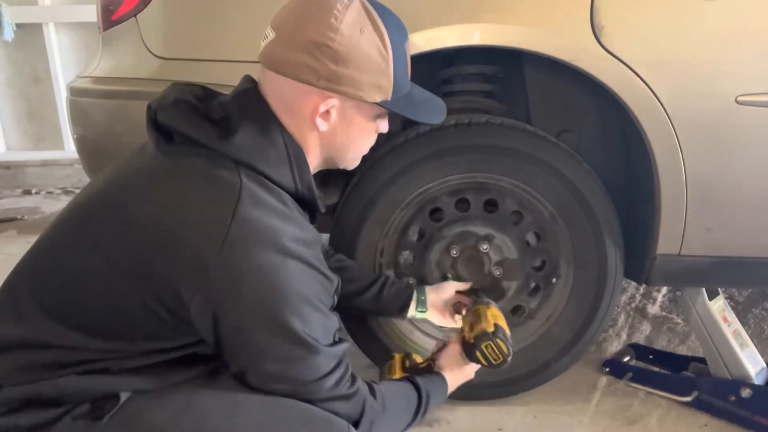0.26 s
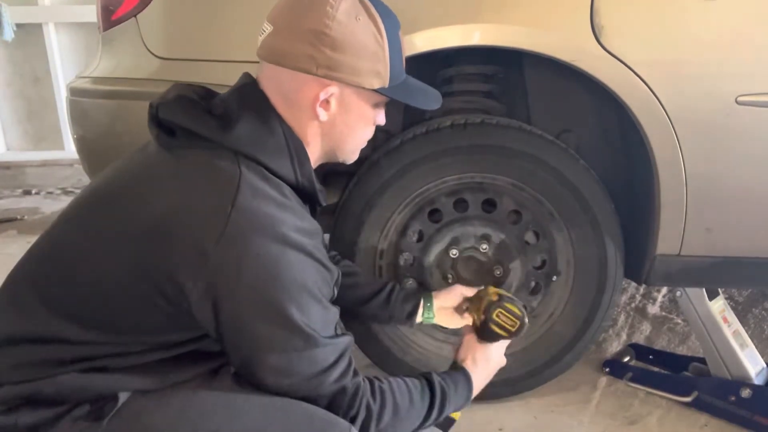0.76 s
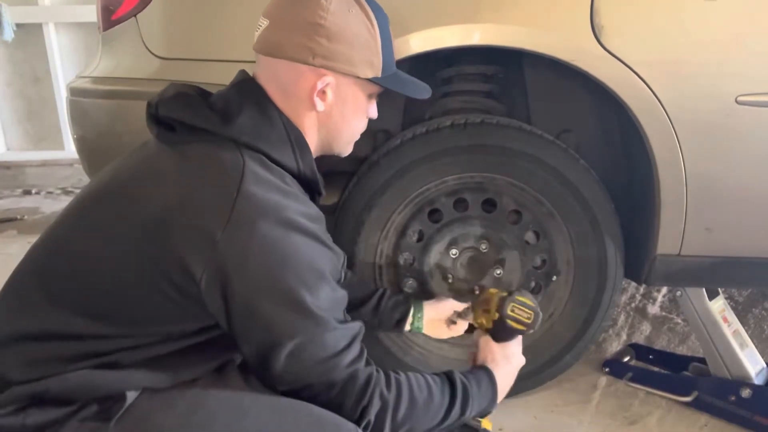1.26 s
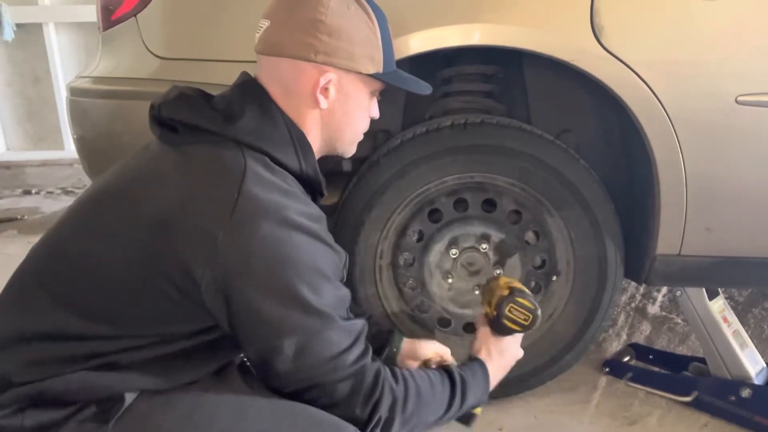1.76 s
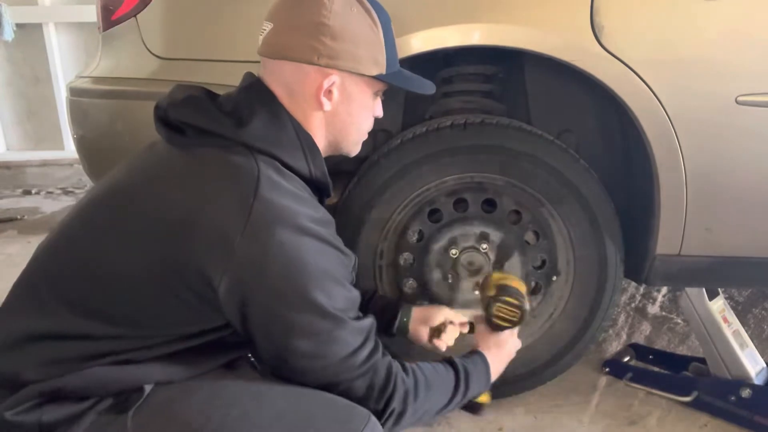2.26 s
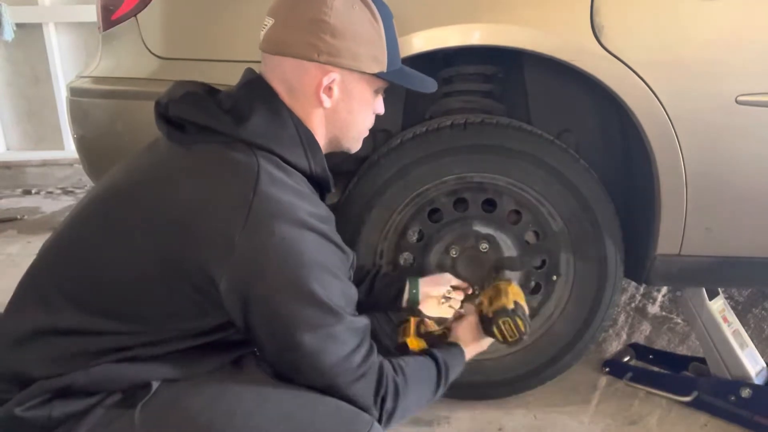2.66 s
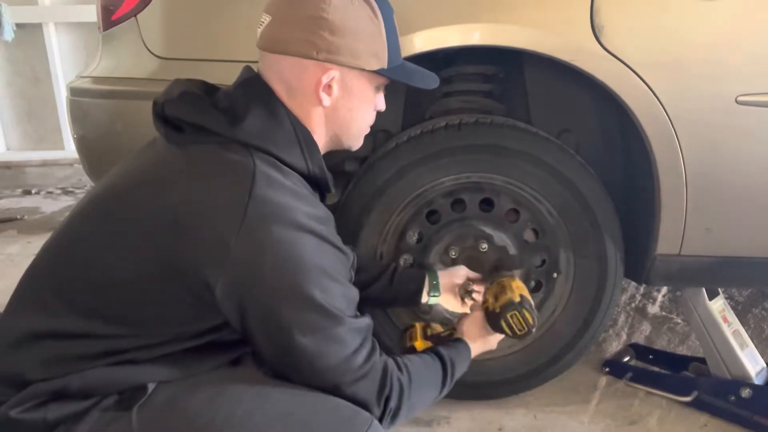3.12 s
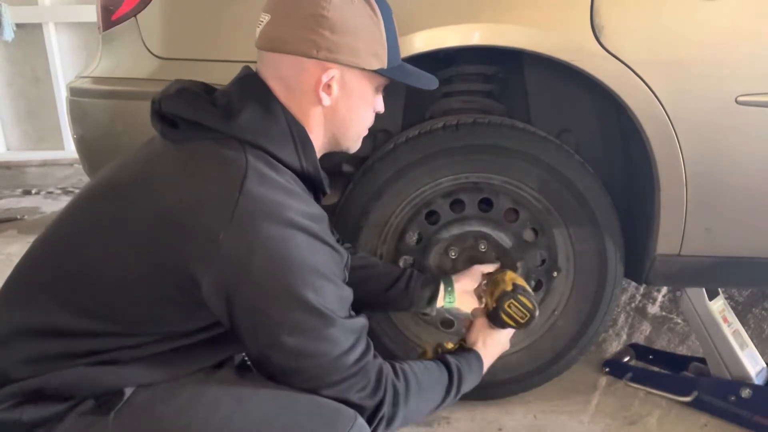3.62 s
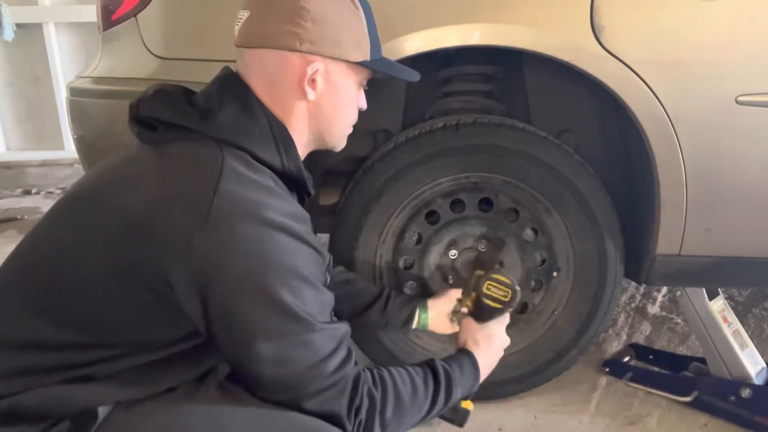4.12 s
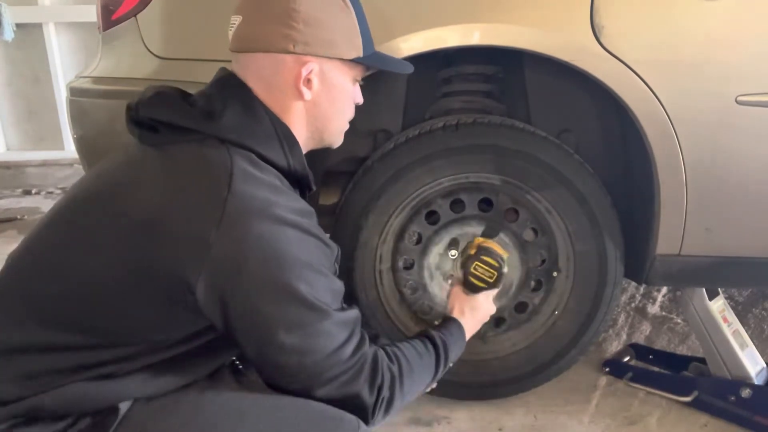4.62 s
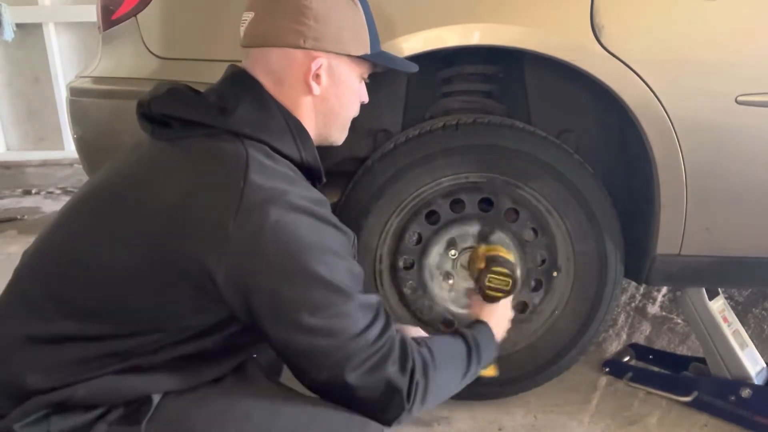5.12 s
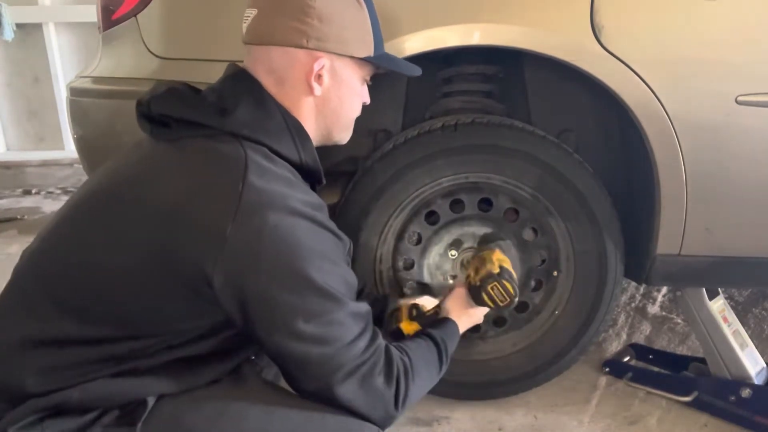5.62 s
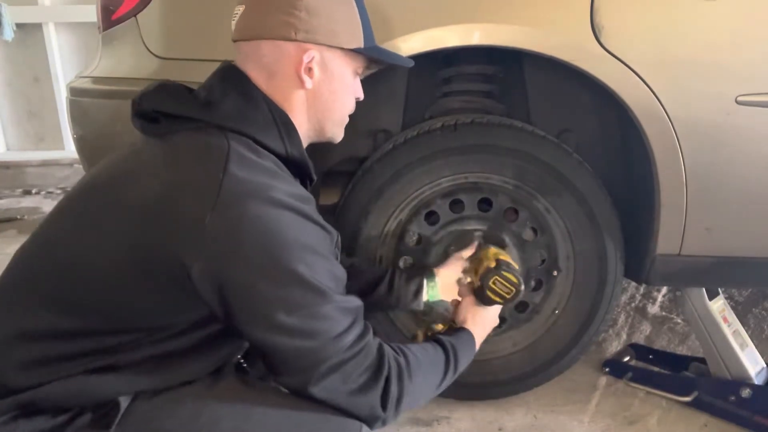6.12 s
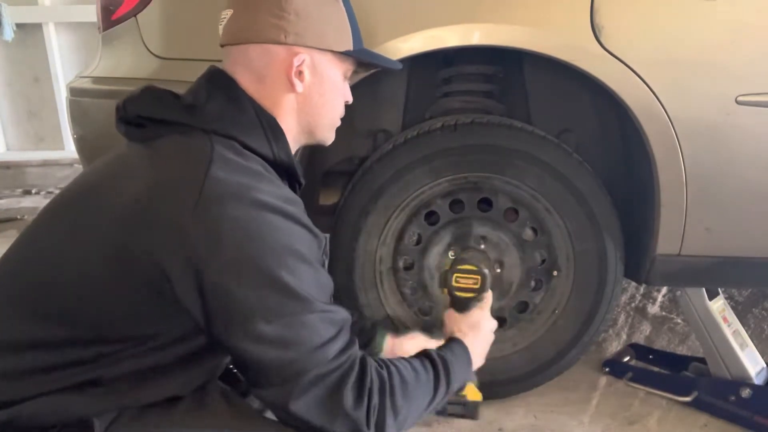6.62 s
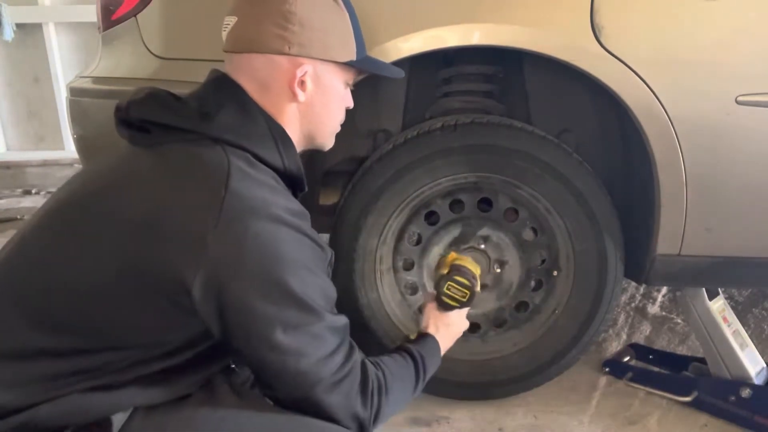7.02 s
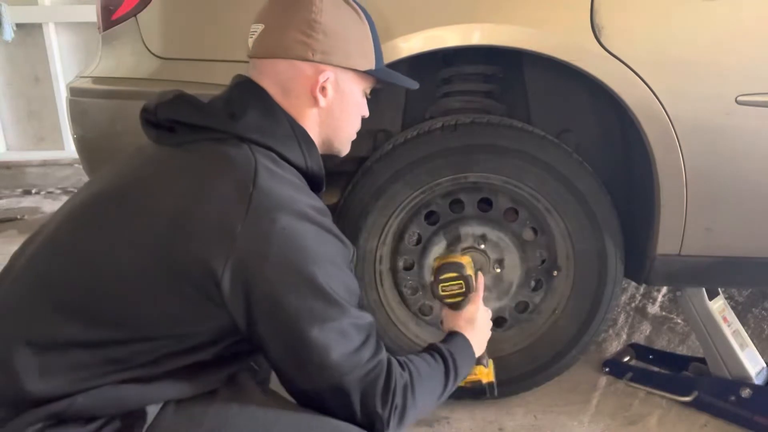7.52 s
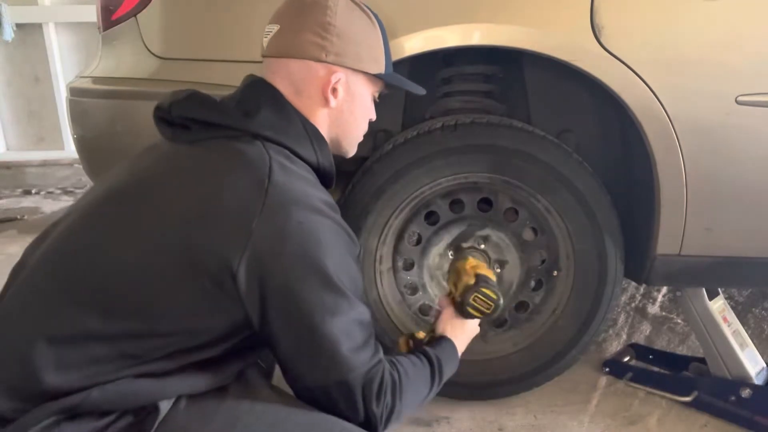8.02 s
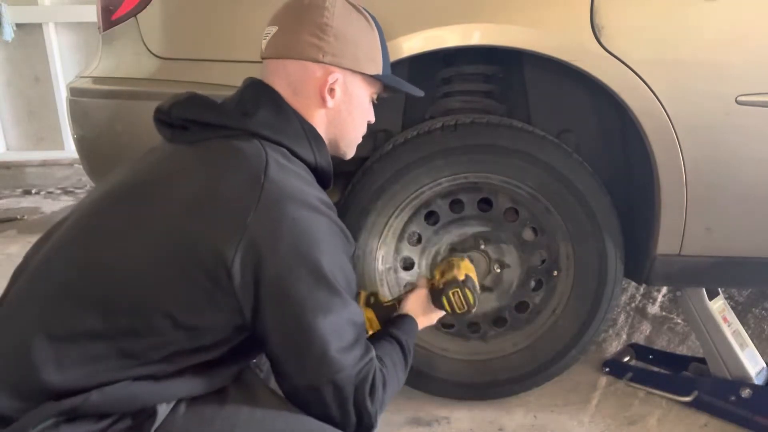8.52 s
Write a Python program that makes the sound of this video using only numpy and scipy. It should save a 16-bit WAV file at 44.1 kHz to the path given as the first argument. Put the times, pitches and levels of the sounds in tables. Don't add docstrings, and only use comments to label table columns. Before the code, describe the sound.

Two hard, brief bursts of metallic hammering, about forty blows a second, each leading into a gritty gear whir and airy fan hiss that falls away. Around them, a socket clunks on nuts, rim and hollow tyre, small parts tick and sleeves brush. It opens on a motor already slowing and closes with a faint last pull. Heard very close in a hard-surfaced space, with a wavering low hum behind.

```python
import sys
import numpy as np
from scipy import signal
from scipy.fft import rfft, irfft, next_fast_len
from scipy.io import wavfile

SR = 44100
rng = np.random.default_rng(int(sys.argv[2]) if len(sys.argv) > 2 else 0)


def log_audio(samples):
    frames = np.atleast_2d(samples).T
    limited = np.clip(frames, -1, 1)
    pcm = np.round(limited * 32767).astype(np.int16)
    wavfile.write(sys.argv[1], SR, pcm)


def rack_gain(trim_db):
    fader = np.asarray(trim_db, float)
    return 10 ** (fader / 20)


N = 386757

# nut_free_s, let_go_s, coast_s, level_db
PULLS = [
    (-.3, 0.24, .55, -2.5),
    (3, 3.582, 0.38, -1.5),
    (5.498, 6.026, 0.45, -3),
    (9.1, 9.5, 0.45, -13),
]
BITES_S = [
    -.7,
    2.83,
    5.355,
    8.737,
]
# offset_s, gear_db, fan_db
RUN_UP = [(-.075, -68, -80), (-.04, -48, -52), (0, -42, -48)]
# offset_s, gear_db, fan_db
BITING = [(0.028, -23, -42), (.17, -38.5, -45)]
# offset_s, gear_db, fan_db
SPINNING = [(0, -30, -43.5), (0.081, -34, -47), (0.182, -42, -44), (.3, -32.5, -32.5)]
# freq_hz, density_db_per_hz
GEAR_SPECTRUM = [(71, -44.5), (120, -0.5), (216, -4.5), (298, -27), (345, -6.5), (630, -10), (708, -6),
                 (1070, -7.5), (1450, -9), (2360, -7.5), (4000, -11), (5200, -37), (8800, -120)]
# tooth_rate_multiple, level_db
MESH_ORDERS = [(.5, -4), (1, -4), (2, 0), (3, 0), (4, -1), (5, -4)]
# freq_hz, density_db_per_hz
FAN_SPECTRUM = [(1470, -40.5), (2500, -25.5), (5120, -2.5), (5620, -3.5), (6900, 1.5), (7920, -7.5),
                (10100, -6), (12600, -5.5), (15500, -4.5), (17000, -20.5)]
# freq_hz, width_hz, gain_db
CASING_MODES = [(705, 80, 5), (1050, 150, 4), (3500, 180, 8)]
# start_s, hum_db, rumble_db, sleeves_db
AROUND = [(0, -43.5, -38.5, -50.5), (.73, -60, -53.5, -69), (1.49, -52, -51.5, -65), (1.65, -86, -62, -67),
          (2.1, -52, -56.5, -56), (2.47, -71, -61.5, -49), (2.61, -40, -50, -39), (2.83, -52, -52, -54),
          (3.3, -43.5, -43, -50), (3.75, -50.5, -51.5, -67), (4.27, -48.5, -50.5, -61.5),
          (4.6, -38.5, -47.5, -62), (5.35, -40, -38, -40), (5.6, -42.5, -37, -54.5),
          (6.4, -40.5, -51.5, -65), (7.45, -38.5, -42.5, -56.5), (7.72, -43.5, -51, -60.5),
          (8.45, -31, -39, -46.5)]
# freq_hz, density_db_per_hz
RUMBLE_SPECTRUM = [(13, -53.5), (22, -31), (54, 2), (70, 2.5), (86, -16.5), (102, -12.5), (129, -10.5),
                   (141, -14), (320, -36), (420, -76), (700, -120)]
# freq_hz, density_db_per_hz
RUSTLE_SPECTRUM = [(120, -33.5), (200, -2.5), (719, -13.5), (1750, -25.5), (7790, -42.5), (11100, -45.5),
                   (14000, -37.5)]
# start_s, peak_db, bright_db, wheel_db
CLATTER = [(2.833, -3, -2.5, -10), (2.8602, -14.5, -9, -23), (2.8714, -8, 3, -22.5), (2.8814, -10, -6, 4),
           (2.9033, -11, 4.5, -19), (2.9164, -8, -3.5, -14.5), (2.933, -8, 2, -22.5),
           (3.1346, -24, -9, -13), (5.358, -8.5, -1.5, -5.5), (5.3822, -12, 0, -26),
           (5.3918, -7, -1.5, -24.5), (5.4034, -10, -0.5, 6), (5.4174, -14.5, -6.5, -5.5),
           (5.4271, -14.5, -1, -26.5), (5.455, -19, 4.5, -24), (5.6745, -31.5, 8.5, -21.5),
           (5.7164, -25, 1.5, -14.5), (8.741, -19, 4.5, -6.5), (8.7557, -27.5, -7.5, -18)]
# start_s, peak_db, bright_db, wheel_db, socket_db
HAMMERING = [(2.9432, -8.5, -2, -7, -5), (2.9687, -8.5, -3.5, -13, -3), (2.9946, -5.5, -2.5, -9, -1.5),
             (3.0197, -9.5, 3.5, 2, -0.5), (3.0448, -5.5, -1.5, -7.5, -1.5), (3.0682, -7, 0.5, -2, -0.5),
             (3.093, -8.5, -2, -11.5, 2.5), (3.1188, -7, -0.5, -14, -4.5), (5.4374, -6, 1, -8.5, 0),
             (5.4632, -9.5, -2.5, -11.5, -1), (5.491, -9.5, 2, -16, -3), (5.516, -9, 1, -1.5, 3),
             (5.5395, -9.5, 0.5, -5, 0), (5.565, -7.5, -1.5, 1.5, 5.5), (5.591, -10, 2.5, -15.5, -1.5),
             (5.6151, -10.5, -0.5, -5.5, 1), (5.6423, -10, -2.5, -4, 7)]
# start_s, peak_db, bright_db
TICKS = [(0.0311, -43.5, 16.5), (0.0611, -39.5, 17.5), (0.102, -41.5, 18), (.146, -43.5, 19.5),
         (.181, -40.5, 21), (0.2837, -46.5, 18.5), (.397, -41, 7), (0.424, -48, 16), (1.818, -60, -1),
         (3.3189, -50, 14), (3.4026, -45.5, 14.5), (3.58, -35.5, 18.5), (3.715, -53, 11), (5.7394, -46, 14),
         (6.1754, -47.5, 15), (.336, -29, 3), (0.5349, -46.5, 3), (.624, -43, -23), (0.661, -42.5, -14),
         (1.3109, -43, -0.5), (1.3663, -41, -14), (1.6894, -56, 14), (1.7014, -52, 16),
         (1.8697, -44.5, -10), (2.7408, -33.5, -15.5), (3.6001, -35, 3), (3.6585, -38.5, 17),
         (3.7664, -39, 1), (3.8577, -48, 11), (3.8816, -29, -15), (3.9502, -34, -16), (4.8556, -33, -11.5),
         (4.8715, -20.5, -14.5), (4.8865, -17.5, -6), (5.2915, -29, 0.5), (7.715, -45.5, -25),
         (7.728, -45.5, -29), (7.786, -51, -27), (7.456, -58, -21), (8.274, -51.5, -2), (8.372, -48.5, -20),
         (8.42, -48.5, -22), (6.0514, -34, 22.5), (6.149, -41, 17.5), (6.203, -44, 14.5),
         (6.2678, -37.5, -3), (6.3368, -44.5, -27)]
# start_s, peak_db, bright_db, wheel_db, thud_db
CLANKS = [(0.1841, -26, -18, 4, -13), (1.895, -17, -14.5, 5.5, -6.5), (1.9991, -28.5, -17.5, 6, -4.5),
          (2.115, -26, -14.5, 3.5, 0), (2.282, -35, 1, 6.5, -18), (2.501, -54, -1, -6.5, -8),
          (2.5494, -21.5, -9.5, -8.5, 4.5), (2.5749, -23.5, -19, -7, 5), (2.6376, -25.5, -6.5, -5.5, 6.5),
          (2.708, -44, -20.5, 7.5, 9.5), (4.695, -47.5, -35, 10.5, 1), (4.755, -55.5, -38, 7.5, -0.5),
          (4.931, -33.5, -16.5, -12.5, 0), (4.569, -26, -27, 1.5, -12.5), (4.6034, -25, -21, 0.5, -4.5),
          (4.9931, -38, -9.5, -1.5, -7.5), (5.1482, -28, -2, 9, 13), (5.188, -44.5, -33, 8.5, 16),
          (6.4171, -50, -8, -14, -24), (6.8414, -13, -11.5, 1.5, -27), (7.0929, -26.5, -14, -1.5, -2.5),
          (8.0517, -57, -8, 18, 11), (8.1115, -17.5, -9, -42, -17), (8.208, -29, -5.5, 8, 5),
          (8.2635, -50, -5.5, -21, 19), (8.3304, -40.5, -58, -2, -23.5)]
# start_s, peak_db, bright_db
BUMPS = [(0.6977, -52.5, -13), (0.788, -59.5, -4.5), (1.0766, -52, -16), (1.117, -54, -10),
         (1.486, -52, -8), (2.3386, -28, -15), (2.3566, -22.5, -7), (2.5408, -27.5, -1),
         (4.0603, -49.5, -24), (5.015, -27.5, -11.5), (7.9536, -57, -24), (8.457, -48, -15),
         (8.5278, -40, -9.5)]
# start_s, peak_db, bright_db
SHOVES = [(5.0891, -36, -15), (7.3765, -39.5, -40.5), (7.6876, -47, -17.5), (7.7377, -46, -32),
          (7.7556, -31, -44), (7.849, -57.5, -29.5), (8.392, -41.5, -22), (8.6, -61.5, -23),
          (8.0801, -36.5, -15), (8.6911, -41.5, -20)]
# wheel_db, thud_db
REACH = [
    (-31.5, -9),
    (-3, -3),
    (4, 5),
]
CHATTER_LIKENESS = [.85, .3, .5]
# freq_hz, level_db, t60_s
SOCKET_MODES = [(1150, -4, .045), (1390, -6, .04), (1530, -3, .05), (1750, -4, .04), (2010, -2, .04),
                (2200, -2, .045), (2680, -6, .05), (3100, -8, .03), (4120, -6, .035), (6000, -8, .02),
                (6700, -8, .02)]
# freq_hz, level_db, t60_s
WHEEL_MODES = [(354, -11, 0.14), (422, -10, 0.1), (530, -5.5, 0.063), (595, -8.5, 0.13), (686, -1.5, 0.029),
               (715, -2, 0.093), (746, -8, 0.06), (824, -12, 0.079)]
# freq_hz, level_db, t60_s
TYRE_MODES = [(65.4, -4, 0.17), (106.8, 1, 0.15), (132, -1, 0.051), (173, -1.5, 0.087), (226, -2, 0.1),
              (305.8, -4.5, 0.03)]
# freq_hz, t60_s
TAIL_DECAY = [(150, 0.92), (600, 0.45), (2000, 0.34), (6000, 0.28), (14000, 0.024)]
# freq_hz, likeness [0-1]
TAIL_LIKENESS = [(100, 1), (500, .15), (2000, .5), (5000, .05), (10000, .2)]
# start_s, pitch_hz, end_pitch_hz, level_db, t60_s
PINGS = [
    (.88, 3780, 3780, -81, .7),
    (1.52, 1180, 1180, -73, .6),
    (4.22, 2380, 2330, -70, .3),
    (4.28, 4500, 3500, -69, .5),
    (6.85, 3490, 3490, -59, .5),
    (7.1, 3490, 3490, -66, .7),
    (8.12, 3490, 3490, -53, .4),
]
# start_s, length_s, scrape_db, hiss_db
SCUFFS = [(1.09, 0.12, -78, -59), (1.363, 0.18, -76, -68), (1.5, .12, -82, -71), (1.707, .14, -82, -80),
          (4.52, 0.081, -66.5, -85.5), (6.813, 0.05, -64, -80), (7.41, 0.049, -68.5, -80),
          (7.494, 0.096, -73.5, -88.5), (7.688, 0.082, -65.5, -69), (8.028, 0.15, -70.5, -63.5),
          (8.304, 0.15, -55, -81.5), (8.548, 0.21, -77, -79.5)]
# freq_hz, density_db_per_hz
SCRAPE_SPECTRUM = [(500, -23), (1000, -0.5), (2100, 6.5), (4000, -11), (7000, -34)]
# freq_hz, density_db_per_hz
BRUSH_SPECTRUM = [(3000, -28), (5500, -5), (11000, -12), (16000, 11)]
# freq_hz, gain_db
PORT_COLOUR = [(20, -2), (6800, 4.5), (8000, 23), (9500, 8), (13300, -2), (14400, -1), (15800, -2),
               (16600, -32)]
# freq_hz, left_minus_right_db
PORT_BALANCE = [(60, -1), (110, 0), (200, -1), (380, -1.0), (700, -4), (1290, -3), (2380, -1), (4400, -4),
                (6500, -2.5), (9000, 0)]
# freq_hz, left_lead_rad
LEFT_RIGHT_PHASE = [(0, .35), (1400, -.9), (2100, -1.9), (3400, -3.1), (5600, -4.6), (6500, -4.4), (7600, -3.2),
                    (9100, -2.95), (10700, -.2), (12900, .15), (14000, 3.1), (17000, 3.14)]
# freq_hz, gain_db
PORT_UNSHARED = [(6300, 0), (7500, -17), (9000, -16), (9900, -7), (11000, -20), (12900, -18), (13500, -8),
                 (14200, -20)]


def rms_one(x):
    return x / np.sqrt(np.mean(x ** 2) + 1e-20)


def in_time(rows):
    s, *columns = np.transpose(rows)
    return np.array([np.interp(np.arange(N) / SR, s, c) for c in columns])


def at_hz(points, hz):
    point_hz, value = np.transpose(points)
    return np.interp(np.log(hz), np.log(point_hz), value)


def drift(rate_hz):
    r = np.exp(-80 * np.pi * rate_hz / SR)
    noise = rng.standard_normal(N // 40 + 2002)
    slow = signal.lfilter([1], [1, -2 * r, r * r], noise)[2000:]
    return np.interp(np.arange(N) / 40, np.arange(len(slow)), rms_one(slow))


def to_stereo(mid, side, alike):
    return np.sqrt(1 + alike) * mid + np.sqrt(1 - alike) * side * [[1], [-1]]


def coloured(spectrum, alike, peaks=()):
    size = next_fast_len(N)
    hz = np.maximum(np.arange(size // 2 + 1) * SR / size, 1)
    gain = rack_gain(at_hz(spectrum, hz))
    for peak_hz, width_hz, peak_db in peaks:
        gain = gain * (1 + (rack_gain(peak_db) - 1) / (1 + (2 * (hz - peak_hz) / width_hz) ** 2))
    mid, side = irfft(rfft(rng.standard_normal((2, size))) * gain, size)[:, :N]
    return rms_one(to_stereo(mid, side, alike))


def drive():
    loaded_hz, freed_hz, top_hz, sag_hz_per_s = 1360, 1335, 1420, 1250
    run_up_db, loaded_db, free_db, fade_db = 1, -7, -3, -10
    let_go_db, let_go_s = -5, 0.02
    gear_coast_db, fan_coast_db = -47, -66
    t = np.arange(N) / SR
    out = np.array([[-140.], [-140.], [loaded_hz], [loaded_db]]) * np.ones(N)
    for bite_s, (free_s, release_s, coast_s, level_db) in zip(BITES_S, PULLS):
        rows = [(bite_s + s, gear, fan) for s, gear, fan in RUN_UP + BITING]
        rows += [(free_s + s, gear, fan) for s, gear, fan in SPINNING]
        since_s = np.maximum(t - release_s, 0)
        spent = since_s / coast_s
        cut_db = level_db + let_go_db * np.minimum(since_s / let_go_s, 1)
        gear_db, fan_db = in_time(rows) + cut_db + np.outer([gear_coast_db, fan_coast_db], spent ** 2)
        slack_s, top_s = rows[-3][0], rows[-1][0]
        tooth_hz = np.interp(t, [free_s, slack_s, top_s], [loaded_hz, freed_hz, top_hz])
        tooth_hz = tooth_hz - sag_hz_per_s * since_s
        share_db = np.interp(t, [bite_s, rows[3][0], slack_s, top_s],
                             [run_up_db, loaded_db, loaded_db, free_db])
        share_db = share_db + fade_db * spent
        on = (t >= rows[0][0]) & (spent < 1.3)
        out[:, on] = np.array([gear_db, fan_db, tooth_hz, share_db])[:, on]
    return out


def motor(gear_db, fan_db, tooth_hz, mesh_db):
    phase = 2 * np.pi * np.cumsum(tooth_hz * (1 + .008 * drift(7))) / SR
    mesh = []
    for port_rad in range(2):
        orders = [rack_gain(db) * drift(25 + 14 * k) * np.sin(k * phase + port_rad) for k, db in MESH_ORDERS]
        mesh.append(sum(orders))
    rattle_db = 1.8 * drift(85)
    gear_flutter_db = rattle_db + 1.2 * drift(15)
    fan_flutter_db = rattle_db + .8 * drift(25)
    whir = rack_gain(gear_db + gear_flutter_db) * coloured(GEAR_SPECTRUM, 0.51, CASING_MODES)
    whine = rack_gain(gear_db + mesh_db) * rms_one(np.array(mesh))
    hiss = rack_gain(fan_db + fan_flutter_db) * coloured(FAN_SPECTRUM, 0.12, CASING_MODES)
    return whir + whine + hiss


def surroundings(gear_db):
    hum_hz, octave_db, grip_db, rustle_floor_db = 83.7, -14.5, -8, -78.5
    hum_db, rumble_db, sleeves_db = in_time(AROUND)
    phase = 2 * np.pi * np.cumsum(hum_hz + 0.58 * drift(2.2)) / SR
    octave_db = octave_db + np.interp(np.arange(N) / SR, [4.0, 8.5], [-8, 0])
    hum = rack_gain(1.8 * drift(6)) * np.sin(phase)
    hum += rack_gain(octave_db + 2.0 * drift(2)) * np.sin(2 * phase + 1)
    rumble = rack_gain(rumble_db + 3.5 * drift(6)) * coloured(RUMBLE_SPECTRUM, .9)
    creases_db = 1.8 * drift(12) + 2.0 * drift(60)
    rustle = rack_gain(sleeves_db) + rack_gain(gear_db + grip_db) + rack_gain(rustle_floor_db)
    rustle = rustle * rack_gain(-5.0 + creases_db) * coloured(RUSTLE_SPECTRUM, 0.057)
    return np.sqrt(2) * rack_gain(hum_db) * hum + rumble + rustle


def chatter(at, levels_db, chatter_ms, die_s, drag_db):
    t = np.arange(SR // 8) / SR
    envelopes = np.zeros((len(levels_db), N + len(t)))
    for k, (i, ms) in enumerate(zip(at, chatter_ms)):
        since_s = np.maximum(t - ms / 1000, 0)
        shape = np.exp(-since_s / die_s[k]) + rack_gain(drag_db) * np.exp(-since_s / 0.03)
        shape = shape * np.minimum(t / (.0008 * ms), 1)
        envelopes[:, i:i + len(t)] += rack_gain(levels_db[:, k, None]) * shape
    edges_hz = [350, 2400, 5500, 17000]
    out = 0
    for envelope, low_hz, high_hz, alike in zip(envelopes, edges_hz, edges_hz[1:], CHATTER_LIKENESS):
        band = signal.butter(2, [low_hz, high_hz], "band", fs=SR, output="sos")
        mid, side = rms_one(signal.sosfilt(band, rng.standard_normal((2, N))))
        out = out + envelope[:N] * to_stereo(mid, side, alike) / np.sqrt(2)
    return out


def struck(at, levels_db, modes, spread_db, scatter_s):
    out = np.zeros(N)
    luck = np.clip(rng.standard_normal((len(at), len(modes), 2)), -1.2, 1.2)
    wait_s = scatter_s * rng.random((len(at), len(modes)))
    for k, (hz, mode_db, t60_s) in enumerate(modes):
        clicks = np.full(N, 1e-18)
        late = np.minimum(at + (wait_s[:, k] * SR).astype(int), N - 1)
        strength = rack_gain(levels_db + mode_db + spread_db * luck[:, k, 0])
        clicks[late] = strength * np.sign(luck[:, k, 1])
        r, w = rack_gain(-60 / (t60_s * SR)), 2 * np.pi * hz / SR
        out += signal.lfilter([0, np.sin(w)], [1, -2 * r * np.cos(w), r * r], clicks)
    return out


def blows():
    thud_db = -18.5
    clatter = [(*row, thud_db, 0) for row in CLATTER]
    return clatter + [(*row[:4], thud_db, row[4]) for row in HAMMERING]


def knocks():
    rows = []
    for kind, reach in zip([TICKS, BUMPS, SHOVES], REACH):
        rows += [(*row, *reach, 0) for row in kind]
    return rows + [(*row, 3.0) for row in CLANKS]


def contacts():
    hammer = blows()
    s, peak_db, bright_db, wheel_db, thud_db, socket_db = np.transpose(hammer + knocks())
    blow = np.arange(len(s)) < len(hammer)
    brief = blow | (bright_db > 9)
    at = np.round((s - .0012 - .0012 * brief) * SR).astype(int)
    later = at + round(.002 * SR)
    low_db = np.where(blow, -14, -13) + socket_db * blow
    mid_db = np.where(blow, -10, -12) + 0.68 * bright_db
    high_db = np.where(blow, -8, -9) + bright_db
    levels_db = peak_db + np.array([low_db, mid_db, high_db])
    out = chatter(at, levels_db, np.where(brief, 3.4, 5.0), np.where(brief, .0013, .004), drag_db=-21.0)
    socket_low_db = peak_db + socket_db + np.where(blow, -16, -17)
    socket_high_db = peak_db + 0.65 * bright_db + np.where(blow, -16, -15)
    heavy_db = peak_db + np.where(blow, -9, -10)
    out += struck(later, socket_low_db, SOCKET_MODES[:6], spread_db=2.5, scatter_s=.0033)
    out += struck(later, socket_high_db, SOCKET_MODES[6:], spread_db=5, scatter_s=.004)
    out += struck(later, heavy_db + wheel_db, WHEEL_MODES, spread_db=3.5, scatter_s=.005)
    out += struck(later, heavy_db + thud_db, TYRE_MODES, spread_db=2.0, scatter_s=.006)
    return out


def yard(x):
    level_db, gap_s = -6.5, 0.0013
    t = np.arange(SR // 2) / SR
    echo = np.zeros((2, len(t)))
    for low_hz in 40 * 2 ** np.arange(0, 9.):
        high_hz, centre_hz = min(2 * low_hz, .45 * SR), 1.4 * low_hz
        band = signal.butter(2, [low_hz, high_hz], "band", fs=SR, output="sos")
        decay = rack_gain(-60 * t / at_hz(TAIL_DECAY, centre_hz))
        mid, side = signal.sosfilt(band, rng.standard_normal(echo.shape)) * decay
        echo += to_stereo(mid, side, at_hz(TAIL_LIKENESS, centre_hz))
    echo *= np.clip(t / gap_s - 1, 0, 1)
    echo /= np.sqrt(np.sum(echo ** 2) / 2)
    return rack_gain(level_db) * signal.fftconvolve(x, echo, axes=1)[:, :N]


def pings():
    out, t = np.zeros(N + SR), np.arange(SR) / SR
    for s, start_hz, end_hz, level_db, t60_s in PINGS:
        hz = end_hz + (start_hz - end_hz) * np.exp(-t / 0.056)
        envelope = np.minimum(t / 0.028, 1) * rack_gain(level_db - 60 * t / t60_s)
        start = round(s * SR)
        out[start:start + SR] += np.sin(2 * np.pi * np.cumsum(hz) / SR) * envelope
    return out[:N] * (1 + .55 * drift(40))


def scuffs():
    t, swells = np.arange(N) / SR, np.zeros((2, N))
    for s, length_s, scrape_db, hiss_db in SCUFFS:
        swell = np.sin(np.pi * np.clip((t - s) / length_s, 0, 1))
        swells += np.outer(rack_gain([scrape_db, hiss_db]), swell)
    grain = rack_gain(4.5 * drift(70))
    scrape = swells[0] * coloured(SCRAPE_SPECTRUM, 0.31)
    brush = swells[1] * coloured(BRUSH_SPECTRUM, 0.22)
    return grain * (scrape + brush)


def scene():
    controls = drive()
    hits = contacts() + pings()
    return motor(*controls) + surroundings(controls[0]) + hits + yard(hits) + scuffs()


def band_limit(x):
    return signal.sosfilt(signal.butter(12, 16470, fs=SR, output="sos"), x)


def record(dry):
    size = next_fast_len(N + 64)
    hz = np.maximum(np.arange(size // 2 + 1) * SR / size, 1)
    lead_rad = np.interp(hz, *np.transpose(LEFT_RIGHT_PHASE))
    gain_db = at_hz(PORT_COLOUR, hz) + at_hz(PORT_BALANCE, hz) * [[.5], [-.5]]
    ports = rack_gain(gain_db) * np.exp(1j * lead_rad * [[1], [0]])
    left, right = rfft(dry, size)
    unshared = (left - right) / 2 * rack_gain(at_hz(PORT_UNSHARED, hz))
    heard = (left + right) / 2 + unshared * [[1], [-1]]
    mix = 1.071 * np.tanh(irfft(heard * ports, size)[:, :N] / 1.225)
    return band_limit(mix)


dry = scene()
out = record(dry)
log_audio(out)
```